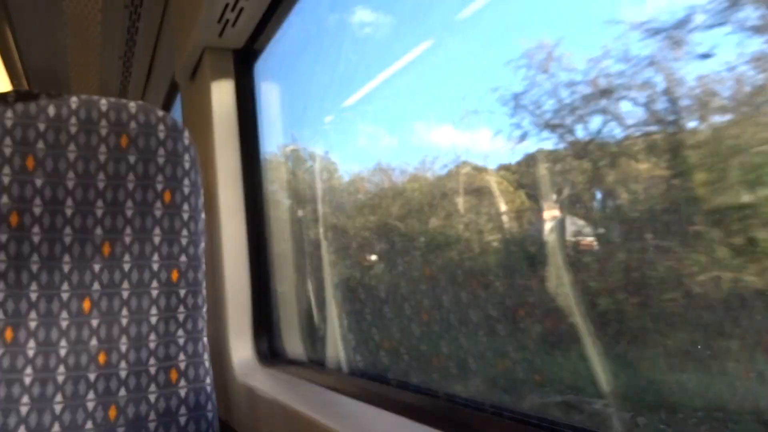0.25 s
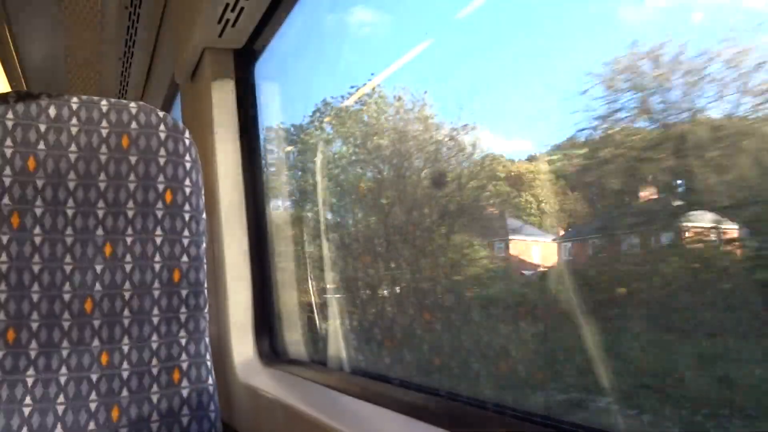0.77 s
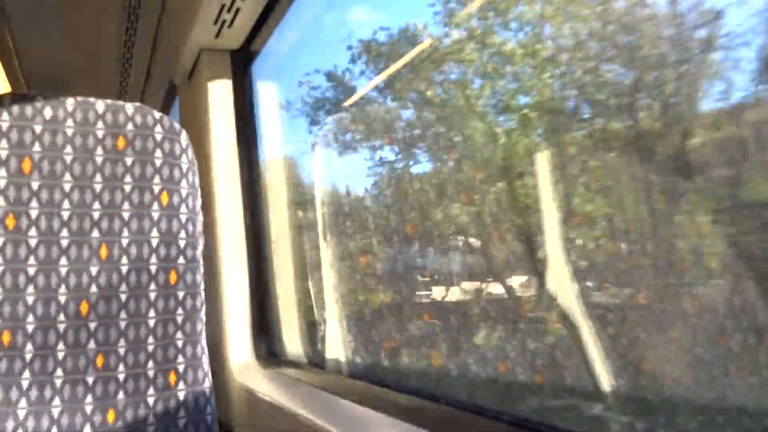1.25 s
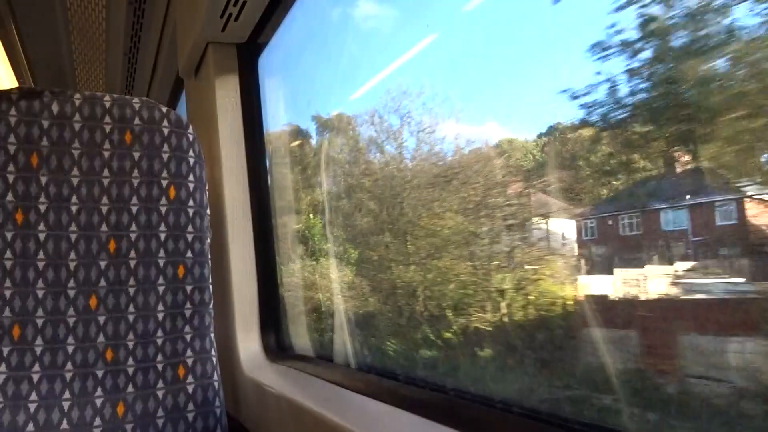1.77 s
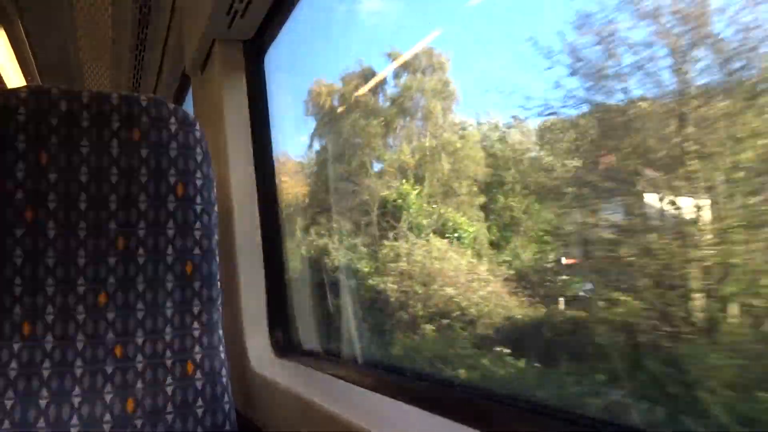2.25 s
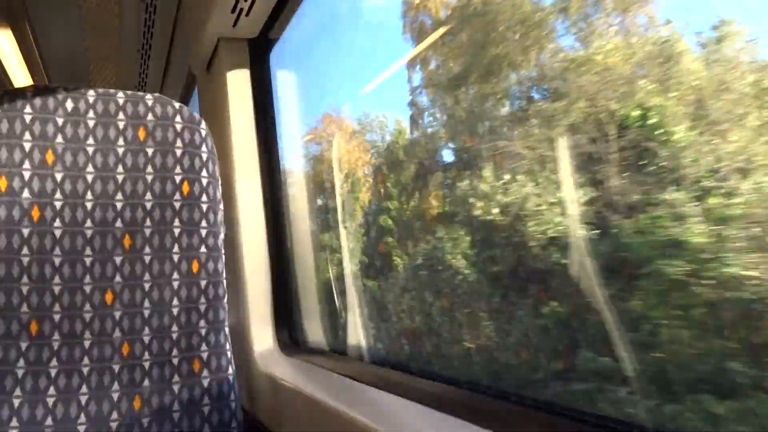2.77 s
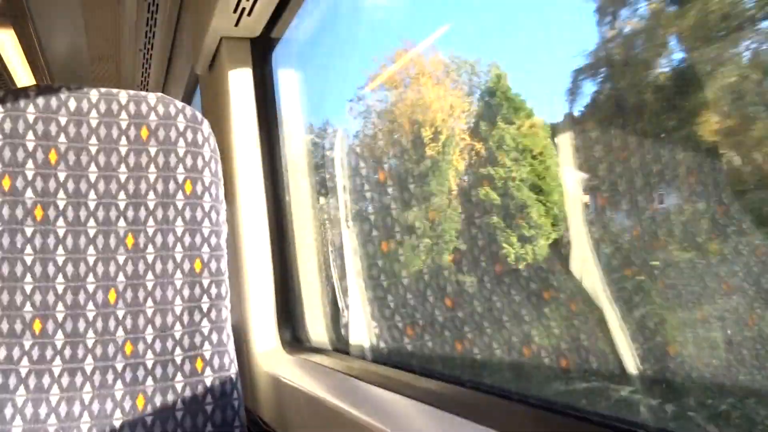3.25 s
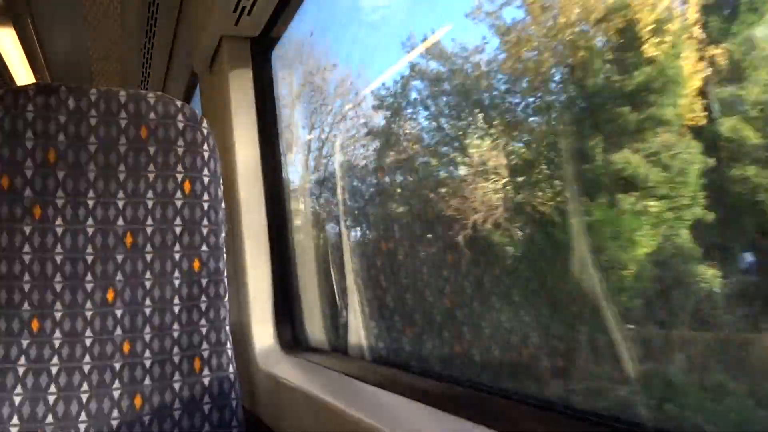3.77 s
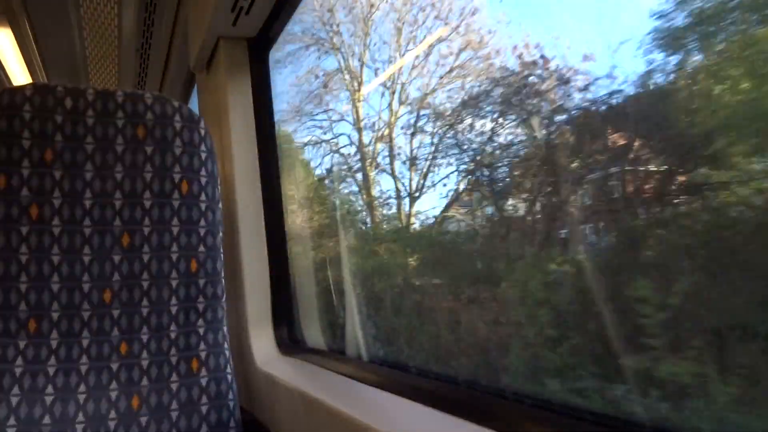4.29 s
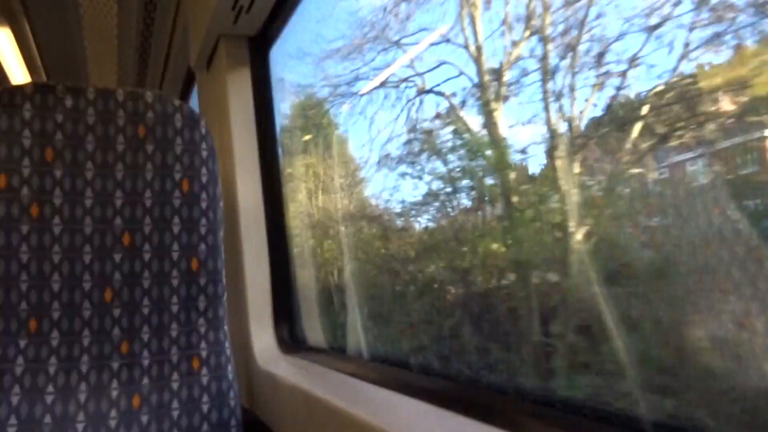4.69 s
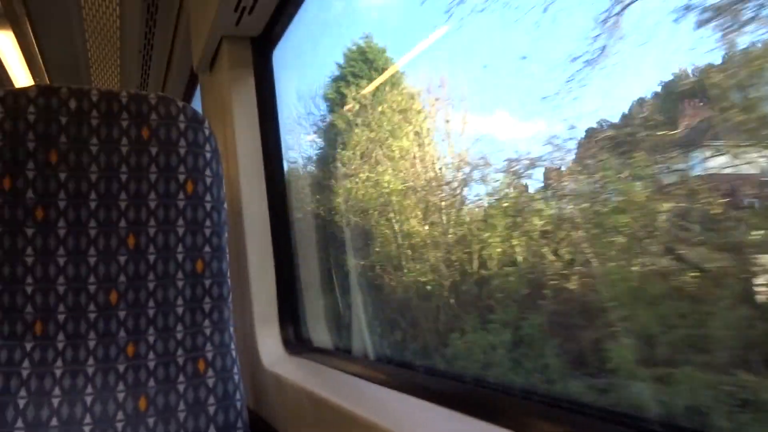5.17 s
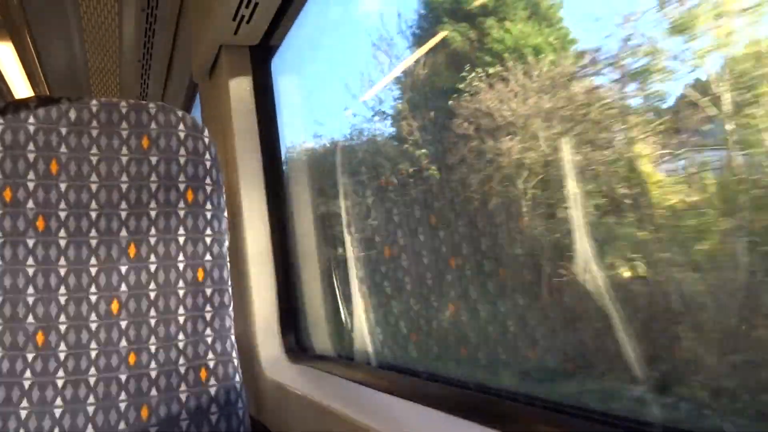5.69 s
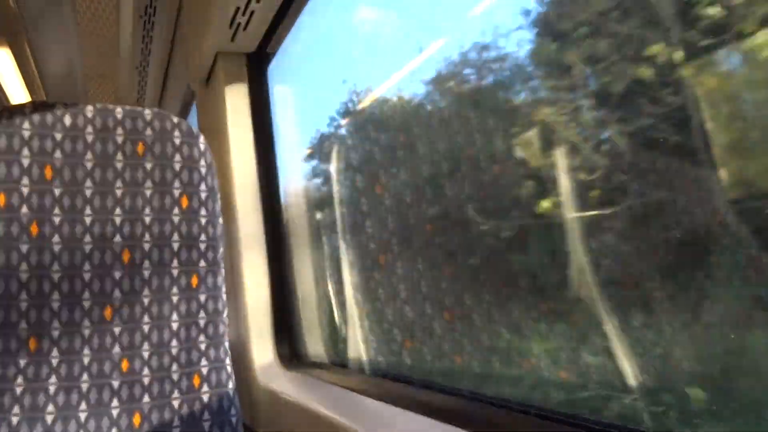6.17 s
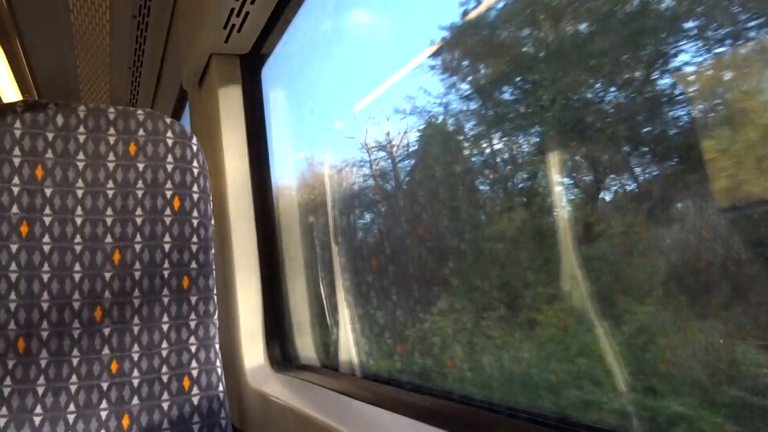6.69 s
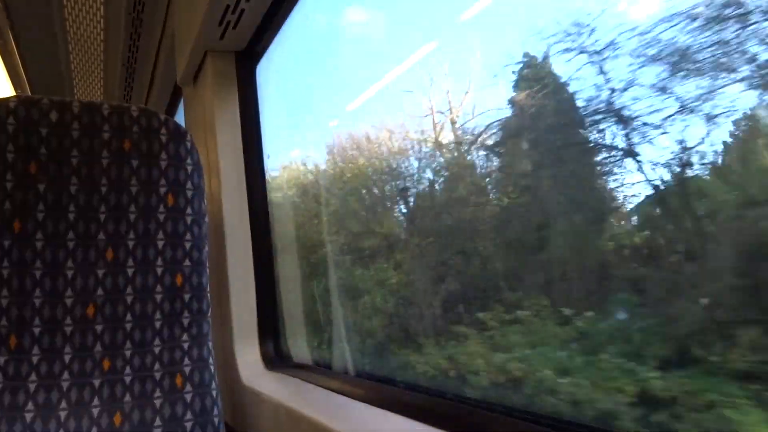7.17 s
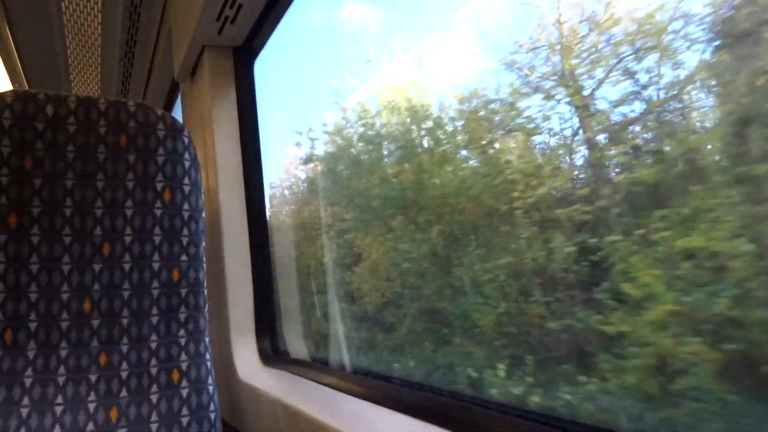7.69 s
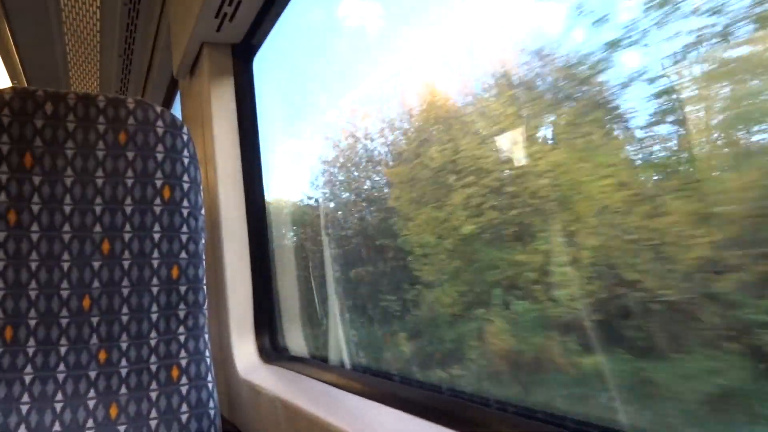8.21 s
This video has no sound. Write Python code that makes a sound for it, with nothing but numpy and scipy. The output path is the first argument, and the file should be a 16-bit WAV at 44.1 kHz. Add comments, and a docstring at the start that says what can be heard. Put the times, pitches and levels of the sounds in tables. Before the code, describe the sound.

Heard from a seat inside a moving diesel carriage: a strong, deep engine drone beats slowly over wheel rumble and faint hiss. Dry scuffs brush by early and loose trim ticks irregularly. Near the middle the driver eases off, the drone drops in pitch and a very high, thin whine slides down. A faint metallic ring swells briefly, then the train coasts more quietly.

```python
"""At a seat inside a diesel train carriage: from the start the underfloor engine drones at full power as
orders of its firing rate, over wheel rumble (coloured noise), a steady auxiliary hum and a turbo whine.
Scuffs brush by and loose trim ticks near the window; from 2.8 s the whine droops. At 3.6 s the driver eases
off: the drone drops, the whine sinks, and from 4.1 s a thin metallic ring (noise band and line) swells.
From 6 s the train coasts: boom, rumble, clatter and hiss lose level, while the ticks go on to 7.5 s."""
import sys
import numpy as np
from scipy import signal
from scipy.fft import rfft, irfft, next_fast_len
from scipy.io import wavfile
from scipy.ndimage import map_coordinates

SR = 44100
rng = np.random.default_rng(int(sys.argv[2]) if len(sys.argv) > 2 else 0)


def output_pcm(signal):
    """Save a mono or channel-first signal as 16-bit PCM at the path in sys.argv[1].

    Samples are clipped to [-1, 1] before scaling.
    """
    pcm = np.clip(np.atleast_2d(signal).T, -1, 1) * 32767
    wavfile.write(sys.argv[1], SR, np.round(pcm).astype(np.int16))


N = 372643

# noise colours, relative: rows of (f/Hz, level/dB)
RUMBLE_COLOUR = [(15, -37), (30, -11), (45, -2.5), (70, -1.5), (105, -1.5), (150, -2), (205, 1),
                 (240, -5.5), (280, -10), (400, -23.5), (700, -55), (2000, -120)]  # wheels through the floor
ROLLING_COLOUR = [(30, -62.5), (150, -30), (300, 2), (390, 3), (470, -2), (570, 2), (670, -5), (800, -3),
                  (920, -3), (1100, -11), (1400, -21), (3000, -67), (6000, -120)]  # wheels on the rails
CLATTER_COLOUR = [(600, -15.5), (1150, -2), (1700, 1), (2150, -1), (2450, -5.5), (2800, -12), (3350, -14.5),
                  (4000, -23.5), (5500, -27.5), (6800, -24.5), (8000, -30), (12000, -32.5), (15700, -37.5)]  # engine clatter
HISS_COLOUR = [(3000, -8.5), (5000, -5), (7000, -12), (8200, -10), (9000, 0), (9600, -4), (10100, 6),
               (10800, -1.5), (11400, -13.5), (12200, -23), (15700, -19)]  # air into the turbocharger
BRUSH_COLOUR = [(1500, -26), (3500, -10), (5500, -2.5), (7000, -3), (10300, 0), (12500, -5), (15700, -9.5)]  # dry scuffs
# width of the noise at the microphone pair: (f/Hz, side level relative to mid/dB)
SIDE_LEVEL = [(60, -34.5), (150, -31.5), (280, -4), (500, -29), (1000, -10.5), (2000, -14), (8000, -14.5),
              (13000, -19)]
# lines of the auxiliary machine: (f/Hz, mean level/dB)
AUXILIARY_LINES = [(361.6, -43.5), (723.2, -46), (867, -49), (1084.5, -55), (1446.4, -63.5)]
# light, dry scuffs: (t/s, level/dB)
SCUFF_TIMES = [(.317, -55), (.386, -47), (.419, -38.5), (2.98, -59), (3.82, -56), (4.521, -58), (6.36, -56)]
# trim near the window: (t/s, ring level before ring_db/dB, ring f/Hz, knock level before panel_db/dB)
TRIM_TICKS = [(0.1007, -41, 8990, -45), (0.2892, -43, 9110, -44), (1.2964, -51, 7510, -34.5),
              (1.4935, -47, 8110, -42), (1.6048, -44, 8160, -38), (1.6427, -41, 8520, -30),
              (1.7519, -45, 8400, -37), (1.7794, -44, 8730, -39.5), (2.3376, -44, 8710, -47),
              (2.6349, -45, 8600, -37), (2.6454, -39, 7970, -35), (2.7452, -43, 9140, -44),
              (2.7564, -42, 8100, -38), (2.7935, -41, 7960, -37), (3.913, -42, 8100, -35),
              (3.9799, -48, 7600, -36), (4.1944, -54, 8560, -33), (4.3889, -46, 8110, -46),
              (4.6044, -46, 8240, -50), (4.7551, -44, 7880, -48), (5.3153, -48, 7890, -35.5),
              (5.4166, -39, 8060, -34.5), (5.6476, -49, 8990, -41), (6.0297, -47, 7900, -45),
              (6.1669, -45, 8040, -47), (6.2831, -41, 7330, -38.5), (6.3605, -42.5, 9160, -45),
              (6.4802, -49, 8110, -39), (7.4016, -46, 9070, -47), (7.5063, -47, 9170, -48)]
# what the trim rings with: (f/Hz, relative level/dB)
TRIM_MODES = [(3700, 5.5), (7350, -9), (7950, -2), (8200, -4), (8550, -4), (9050, -1), (10000, -4)]
# whine, before the floor: (t/s, relative level/dB)
WHINE_LEVEL = [(0, -67), (2.7, -69), (3.05, -60.5), (3.85, -66), (4.5, -77), (5.4, -63.5), (5.8, -76),
               (8.45, -95)]
# what the floor lets through of the whine: (f/Hz, gain/dB)
FLOOR_LEAK = [(5000, -15), (7200, -14), (9000, -9), (10000, -1), (11400, -1), (12000, -24), (16000, -34.5)]
# engine and belt drives, before the panels: (multiple of firing rate, full-power level/dB, eased level/dB)
ENGINE_ORDERS = [(4 / 3, -33.5, -37.5), (3 / 2, -49, -36.5), (9 / 5, -24.5, -32.5), (2, -22.5, -25.5),
                 (7 / 3, -33.5, -41), (5 / 2, -35.5, -35.5), (27 / 10, -32.5, -37), (6 / 2, -35, -32.5),
                 (18 / 5, -35.5, -44), (9 / 2, -45, -43.5), (12 / 2, -44, -43), (18 / 2, -42.5, -49.5),
                 (209 / 20, -49.5, -59.5), (24 / 2, -49.5, -62), (42 / 2, -56, -63), (48 / 2, -54.5, -58.5),
                 (84 / 2, -68, -81)]
# panels that an order can set booming, and one dead spot of the cabin: (f/Hz, half width/Hz, gain/dB)
BODY_PANELS = [(64.5, 3, 7), (75, 2, -6), (156.5, 2, 7), (177, 3, 9), (240, 2.3, 7), (396, 20, 15),
               (458, 16, 16), (486, 3, 7), (840, 5, 8), (1683, 6, 7.5)]
# stereo balance: (f/Hz, left minus right level/dB)
LEFT_BALANCE = [(60, 1.7), (150, 1.7), (260, .3), (500, 1.5), (2000, .2), (8000, -2), (12000, 0)]
# phase between the sides: (f/Hz, lead of the left/rad)
LEFT_LEAD = [(0, 0.058), (260, 0.39), (520, -0.95), (780, 0.31), (1120, 0.14), (1640, 0.0), (3010, 0.22)]

# the driver eases off, then the load comes off and the train coasts: start and length of each (s)
EASE_S, EASE_LENGTH_S = 3.6, 0.4
COAST_S, COAST_LENGTH_S = 6.05, 0.65
# firings per second: they creep up at full power and sag once eased off
FULL_HZ, CREEP_HZ_PER_S, EASED_HZ, SAG_HZ_PER_S = 80.1, 0.31, 59.5, 0.43

# each at full power, eased off, coasting
BOOM_DB = (-16, -22.7, -36)  # exhaust boom at the firing rate, before panels, beat and fade
RUMBLE_DB = (-22.5, -23.5, -24)
ROLLING_DB = (-33.4, -33, -34)
CLATTER_DB = (-42, -43.5, -46)
CHATTER_RATE = (5, 22, 2.5)  # trim contacts per second

# at full power the boom beats slowly, as against a second engine, and fades
BEAT_HZ, BEAT_CREST_S, BEAT_DB = 0.696, 0.3, 1.6
BOOM_FADE_DB_PER_S = 0.58
# whine at full speed, its droop shortly before the engine slows, then the run-down and its time constant
TURBO_HZ, DROOP_S, DROOP_HZ_PER_S = 11370, 2.78, 920
TURBO_IDLE_HZ, RUN_DOWN_S = 6500, 0.98
# intake hiss: level at full speed, loss as the turbocharger slows, change when coasting
INTAKE_DB, INTAKE_DB_PER_OCTAVE, INTAKE_COAST_DB = -60, 11.5, -4
# band limit, and softening of the two ends
TOP_HZ, FADE_S = 15750, 0.003


def amp(db):
    """Decibels to gain."""
    return 10 ** (np.asarray(db) / 20)


def unit(x):
    """Scaled to rms 1."""
    return x / np.sqrt(np.mean(x ** 2) + 1e-20)


def seconds():
    """Time of every sample, in seconds."""
    return np.arange(N) / SR


def along(points, hz):
    """(f/Hz, value) points read on a log frequency axis."""
    f, value = np.transpose(points)
    return np.interp(np.log(hz + 1), np.log(f + 1), value)


def wobble(rate):
    """A smooth random curve with rate knots a second."""
    knots = rng.standard_normal(int(N * rate / SR) + 4)
    return map_coordinates(knots, [np.arange(N) * rate / SR])


def filtered(x, response):
    """x shaped by a response of frequency."""
    m = next_fast_len(N + SR // 2)
    spectrum = rfft(x, m) * response(np.fft.rfftfreq(m, 1 / SR))
    return irfft(spectrum, m)[..., :N]


def rush(colour):
    """Coloured stereo noise of rms 1, nearly alike at the two close microphones."""
    def mid_side_gain(hz):
        return amp(along(colour, hz)) * amp([0 * hz, along(SIDE_LEVEL, hz)])

    mid, side = filtered(rng.standard_normal((2, N)), mid_side_gain)
    return unit(np.array([mid + side, mid - side]))


def tone(phase):
    """A sine of rms 1."""
    return np.sqrt(2) * np.sin(phase)


def turning(hz):
    """Phase of something that turns hz times a second."""
    return 2 * np.pi * np.cumsum(hz) / SR


def add(track, s, sound):
    """Lay a short sound into a track at time s."""
    part = track[max(round(s * SR), 0):][:len(sound)]
    part += sound[:len(part)]


def ramp(start, length):
    """A smooth step from 0 to 1."""
    u = np.clip((seconds() - start) / length, 0, 1)
    return u * u * (3 - 2 * u)


def by_throttle(values):
    """Glide through the values for full power, eased off and coasting."""
    full, eased, coasting = values
    easing = (eased - full) * ramp(EASE_S, EASE_LENGTH_S)
    return full + easing + (coasting - eased) * ramp(COAST_S, COAST_LENGTH_S)


def firing_rate():
    """Firings per second: high under power, dropping quickly when the driver eases off."""
    t = seconds()
    full = FULL_HZ + CREEP_HZ_PER_S * np.minimum(t, EASE_S)
    eased = EASED_HZ - SAG_HZ_PER_S * (t - EASE_S - EASE_LENGTH_S)
    return full + (eased - full) * ramp(EASE_S, EASE_LENGTH_S)


def rotor_pitch():
    """The turbocharger holds its speed, droops, then runs down as the exhaust flow falls."""
    t = seconds()
    driven = TURBO_HZ - DROOP_HZ_PER_S * (np.clip(t, DROOP_S, EASE_S) - DROOP_S)
    run_down = np.exp(-np.maximum(t - EASE_S, 0) / RUN_DOWN_S)
    return TURBO_IDLE_HZ + (driven - TURBO_IDLE_HZ) * run_down


def running(firing, pulse_depth=0.1):
    """Wheels rumble and roar through the floor; clatter pulses with the firings."""
    rumble = amp(by_throttle(RUMBLE_DB) + 0.3 * wobble(9.7)) * rush(RUMBLE_COLOUR)
    rolling = amp(by_throttle(ROLLING_DB) + 0.55 * wobble(4.34)) * rush(ROLLING_COLOUR)
    pulse = unit(1 + pulse_depth * np.cos(turning(firing)) + 0.11 * wobble(60))
    clatter = amp(by_throttle(CLATTER_DB)) * pulse * rush(CLATTER_COLOUR)
    return rumble + rolling + clatter


def auxiliary(sway_db=3.0, drift_rad=0.65):
    """The machine's steady lines waver in level and phase as the carriage sways."""
    hum = np.zeros(N)
    for hz, db in AUXILIARY_LINES:
        level = amp(db + sway_db * wobble(4))
        hum += level * tone(2 * np.pi * hz * seconds() + drift_rad * wobble(6))
    return hum


def scuffs(t60=0.14):
    """Short bright brushes of noise that start at once and fade by 60 dB in t60 seconds."""
    envelope, t = np.zeros(N), np.arange(SR // 4) / SR
    for s, db in SCUFF_TIMES:
        add(envelope, s, amp(db - 60 * t / t60) * (1 - np.exp(-t / 0.00078)))
    return envelope * rush(BRUSH_COLOUR)


def contact(hz, t60=0.03, focus_hz=400, grit=0.37):
    """One touch of the trim: its modes nearest hz ring most, roughened by the scrape of the edge."""
    t = np.arange(SR // 10) / SR
    f, db = np.transpose(TRIM_MODES)
    nearness = 0.31 + np.exp(-((f - hz) / focus_hz) ** 2)
    gains = amp(db + rng.normal(0, 3.3, len(f))) * nearness
    mode_hz = f * rng.normal(1, .014, len(f))
    ring = gains @ np.sin(2 * np.pi * np.outer(mode_hz, t)) / np.linalg.norm(gains)
    scrape_band = signal.butter(2, [7000, 10000], "band", fs=SR, output="sos")
    scrape = signal.sosfilt(scrape_band, rng.standard_normal(len(t)))
    return (ring + grit * unit(scrape)) * amp(-60 * t / t60) * (1 - np.exp(-t / 0.0005))


def knock(hz=2090, t60=0.045, spread=0.041):
    """The panel behind the trim rings in three close modes."""
    t = np.arange(SR // 10) / SR
    modes = hz * (1 + spread * np.linspace(-1, 1, num=3) + rng.normal(0, 0.016, size=3))
    weights = np.hanning(5)[1:-1]  # the middle mode is strongest
    ring = weights @ np.sin(2 * np.pi * (np.outer(modes, t) + rng.random((3, 1))))
    return ring * amp(-60 * t / t60) * (1 - np.exp(-t / 0.0017))


def trim(ring_db=-2.5, panel_db=5, chatter_db=-57):
    """Loose trim ticks amid faint chatter, which is densest when the slowed engine shakes it."""
    track = np.zeros(N)
    for s, db, hz, knock_db in TRIM_TICKS:
        # only the firm contacts also knock the panel behind
        firm = np.clip((knock_db + 43) / 5, 0, 1)
        add(track, s, amp(db + ring_db) * contact(hz) + firm * amp(knock_db + panel_db) * knock())
    chatter_times = np.flatnonzero(rng.random(N) < by_throttle(CHATTER_RATE) / SR) / SR
    for s in chatter_times:
        size = amp(chatter_db + rng.normal(0, 3.4))
        add(track, s, size * (contact(rng.uniform(7500, 9300)) + amp(4.5) * knock()))
        # the loose edge falls back about one engine shake later
        add(track, s + rng.uniform(.011, .017), size * contact(rng.uniform(7500, 8100)))
    return track


def singing(centre_hz=1715, width_hz=115, peak_db=-47, start_s=4.09, attack_s=0.5, fade_db_per_s=9,
            line_hz=1667, line_db=-56):
    """A narrow metallic ring swells for a moment as the engine settles and leaves one thin, wavering line."""
    t = seconds()
    band = unit(filtered(rng.standard_normal(N), lambda hz: np.exp(-((hz - centre_hz) / width_hz) ** 2)))
    swell = amp(peak_db - fade_db_per_s * np.maximum(t - start_s - attack_s, 0))
    line = amp(line_db + 2.2 * wobble(4)) * tone(2 * np.pi * line_hz * t + 0.5 * wobble(6))
    return ramp(start_s, attack_s) * (swell * band + line)


def intake(rotor):
    """Air hisses into the turbocharger, fading as it slows."""
    slowing = INTAKE_DB_PER_OCTAVE * np.log2(rotor / TURBO_HZ)
    level = INTAKE_DB + slowing + INTAKE_COAST_DB * ramp(COAST_S, COAST_LENGTH_S)
    return amp(level) * rush(HISS_COLOUR)


def turbo(hz, flutter_hz=40, breath=0.61):
    """Two blade tones sink together as the rotor runs down, each in a narrow band of rushing air."""
    db = np.interp(seconds(), *np.transpose(WHINE_LEVEL))
    phase = turning(hz + flutter_hz * wobble(250) + 15 * wobble(11))
    whine = np.zeros(N)
    for ratio in (1, 7 / 5):
        blade = ratio * phase
        air = breath * (wobble(700) * tone(blade) + wobble(700) * tone(blade + np.pi / 2))
        level = db - 1 + along(FLOOR_LEAK, ratio * hz) + 2.5 * wobble(40)
        whine += amp(level) * (tone(blade) + air)
    return whine


def panels(hz):
    """The dB that the carriage body adds to a tone near each panel resonance."""
    return sum(db / (1 + ((hz - centre) / width) ** 4) for centre, width, db in BODY_PANELS)


def engine(firing, boom_sway_db=0.6, sway_db=1.56, rough=0.046, growl_db=-56, load_db=4):
    """Engine orders follow the speed; body panels boom as an order sweeps through them."""
    t = seconds()
    phase = turning(firing)
    power = np.clip((firing - firing.min()) / np.ptp(firing), 0, 1)
    # whole orders crest together, one thud per firing; the cabin turns their phase as the speed changes
    crest = np.pi / 2 * (1 + power)
    beat = BEAT_DB * np.cos(2 * np.pi * BEAT_HZ * (t - BEAT_CREST_S))
    full_power_change = power * (beat - BOOM_FADE_DB_PER_S * t)
    boom = by_throttle(BOOM_DB) + panels(firing) + full_power_change + boom_sway_db * wobble(5)
    drone = amp(boom) * tone(phase + crest + .03 * wobble(17))
    for order, full_db, eased_db in ENGINE_ORDERS:
        level = eased_db + power * (full_db - eased_db) + panels(order * firing) + sway_db * wobble(2.95)
        start = crest if order == round(order) else rng.uniform(0, 2 * np.pi)
        # uneven combustion shakes each order a little
        shaken = tone(order * phase + start + rough * wobble(25))
        drone += amp(level) * (1 + rough * wobble(25)) * shaken
    # three unequal firings to a turn of the crankshaft fill in a growl of weak shaft orders
    growl = np.zeros(N)
    for k in range(28, 36):
        growl += amp(rng.normal(0, 2)) * tone(k * phase / 3 + rng.uniform(0, 2 * np.pi))
    return drone + amp(growl_db + load_db * power) * growl


def scene():
    """Everything heard at the seat, the bass a little stronger on the left and out of step between sides."""
    firing, rotor = firing_rate(), rotor_pitch()
    cabin = running(firing) + auxiliary() + scuffs() + trim() + singing()
    cabin = cabin + intake(rotor) + turbo(rotor) + engine(firing)
    sides = np.array([[.5], [-.5]])  # left, right: each takes half the difference

    def stereo(hz):
        return amp(sides * along(LEFT_BALANCE, hz)) * np.exp(1j * sides * along(LEFT_LEAD, hz))

    return filtered(cabin, stereo)


def record(dry):
    """The recorder keeps nothing above its band limit; the ends are softened."""
    ends = ramp(0, FADE_S) * (1 - ramp(N / SR - FADE_S, FADE_S))
    return filtered(dry * ends, lambda hz: hz < TOP_HZ)


dry = scene()
out = record(dry)
output_pcm(out)
```